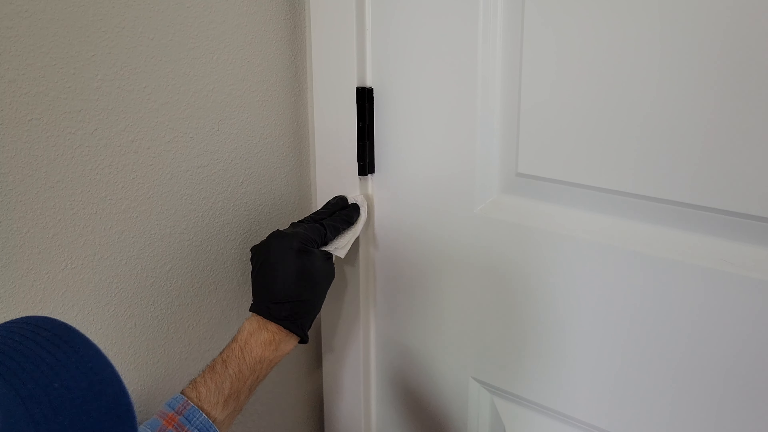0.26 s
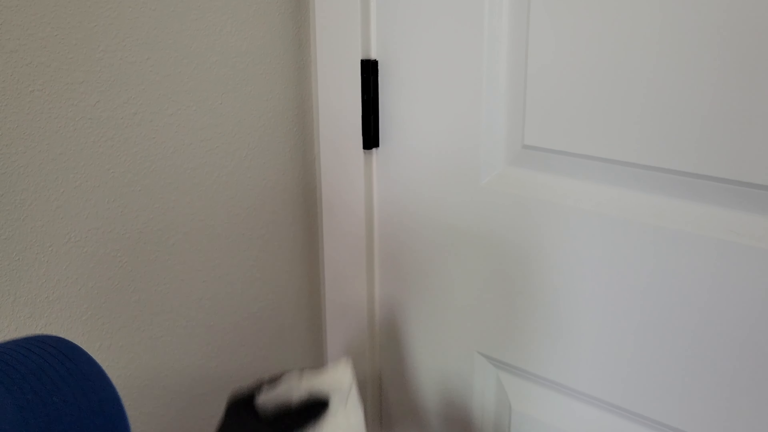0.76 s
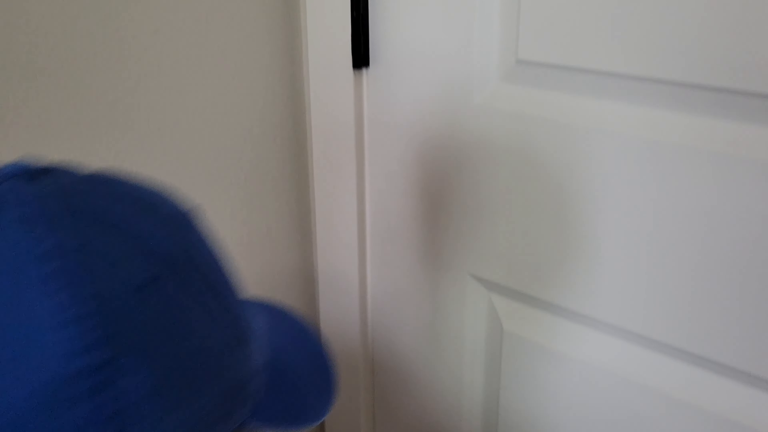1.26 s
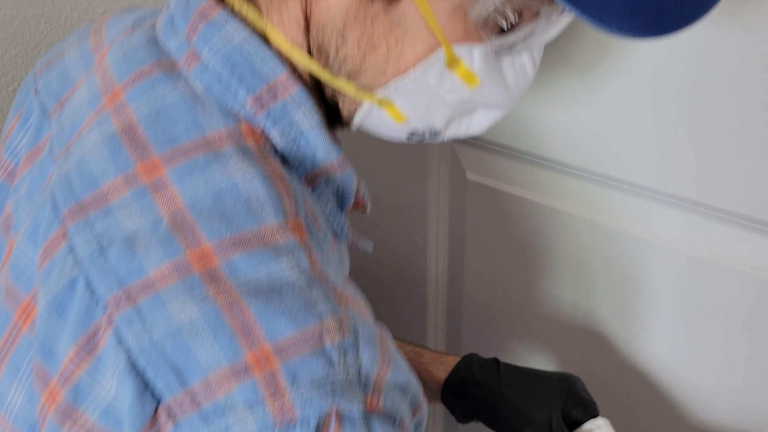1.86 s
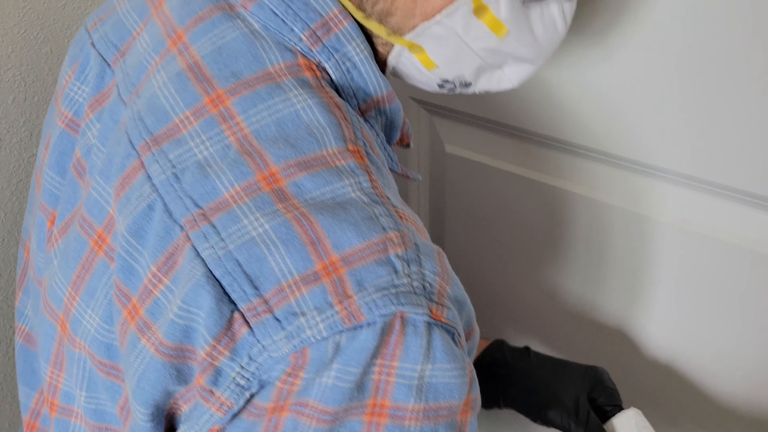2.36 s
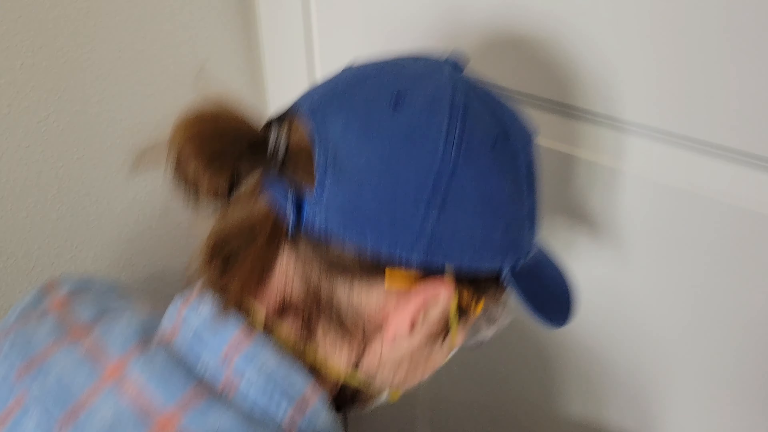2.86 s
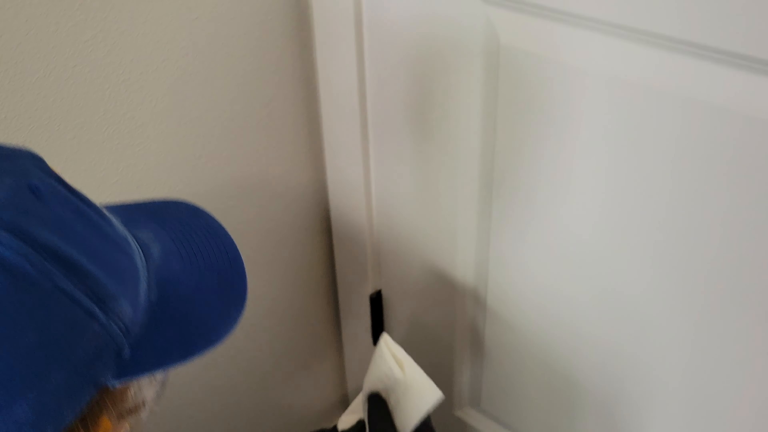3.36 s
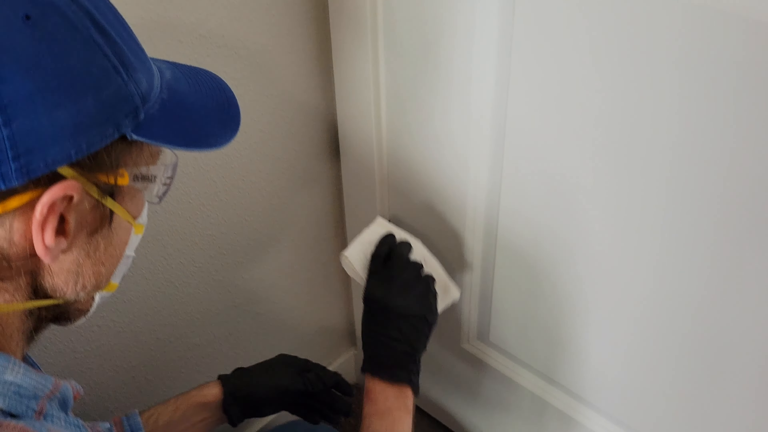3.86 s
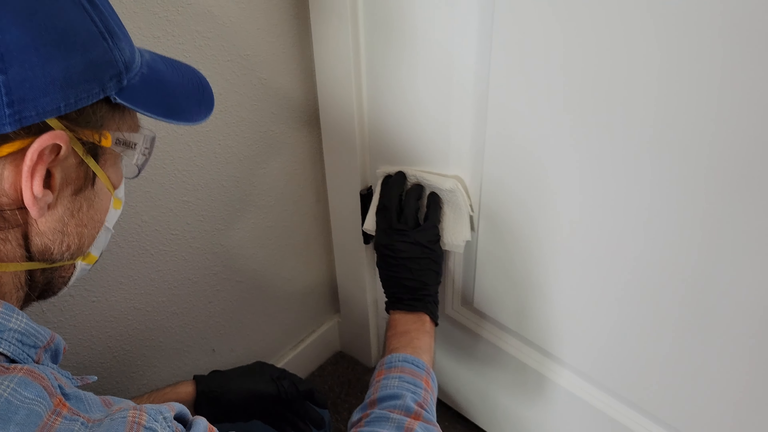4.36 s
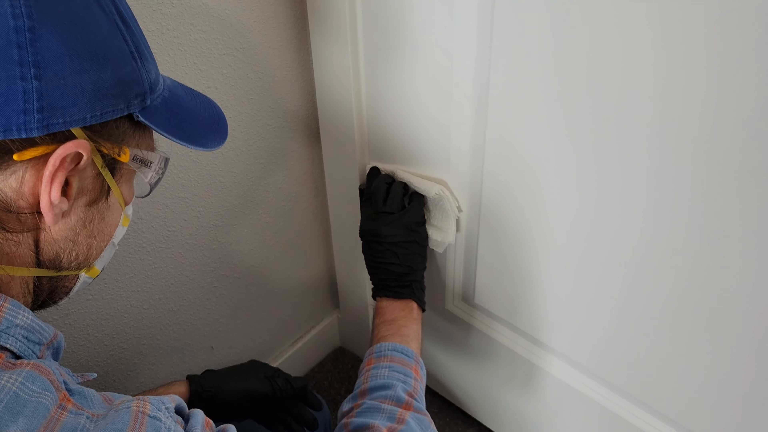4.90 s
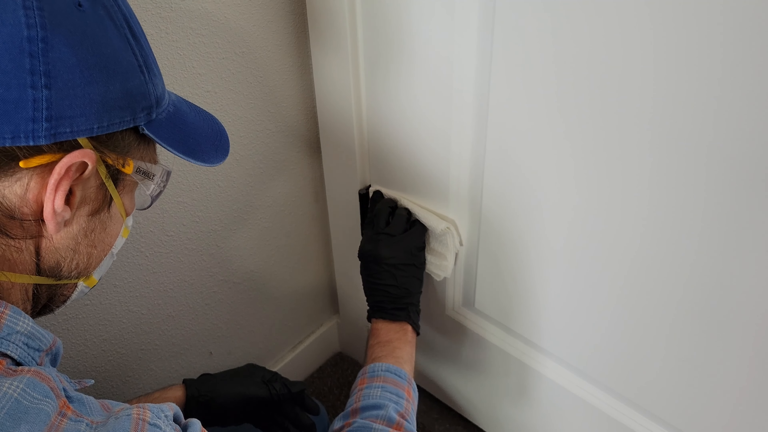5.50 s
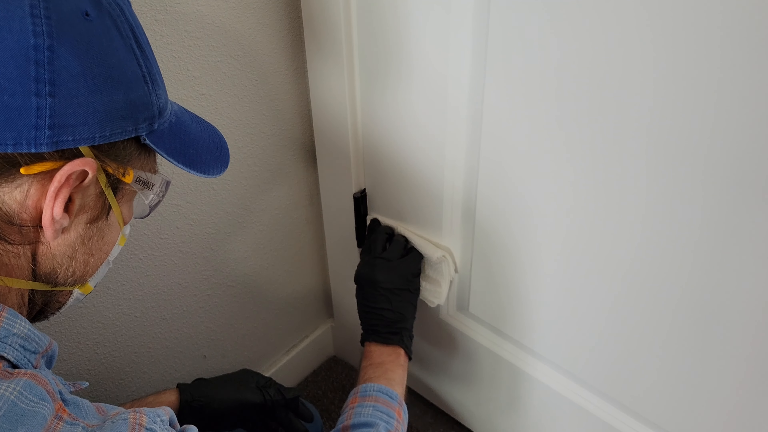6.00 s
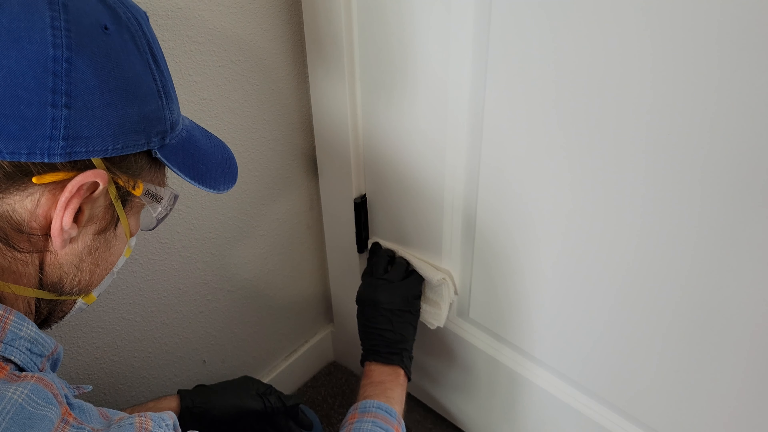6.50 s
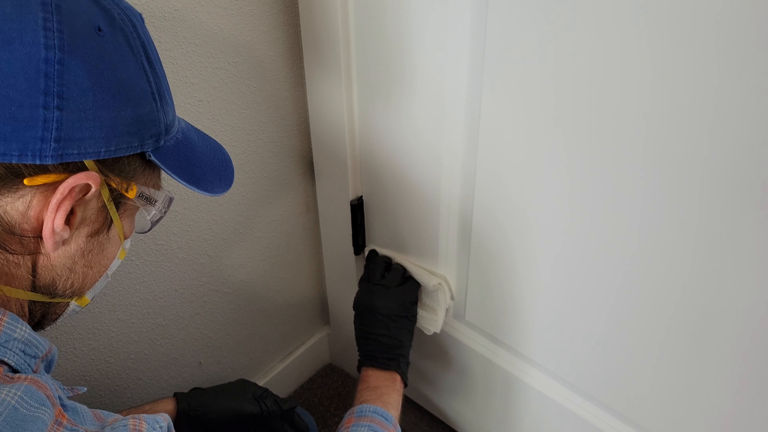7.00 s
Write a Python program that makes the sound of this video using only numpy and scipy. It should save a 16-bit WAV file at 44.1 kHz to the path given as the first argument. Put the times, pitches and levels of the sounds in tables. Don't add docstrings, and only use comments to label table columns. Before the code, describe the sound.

Over a steady, low ventilation rumble, a paper towel brushes lightly along a door frame. It is then folded and shifted with irregular rustles, small crackles and sleeve movement, while a knee thuds softly on the floor and a can drags briefly with a hollow scrape. Longer dry wipes over a hinge follow, ending in quick fingertip taps. Close stereo microphone in a small, dry hallway.

```python
import sys
import numpy as np
from scipy import signal
from scipy.fft import rfft, irfft, next_fast_len
from scipy.io import wavfile
from scipy.ndimage import uniform_filter1d

SR = 44100
rng = np.random.default_rng(int(sys.argv[2]) if len(sys.argv) > 2 else 0)


def waveform_to_disk(signal):
    frames = np.transpose(np.atleast_2d(signal))
    scaled = np.clip(frames, -1, 1) * 32767
    samples = np.round(scaled).astype(np.int16)
    wavfile.write(sys.argv[1], SR, samples)


def makeup_ratio(level_db):
    decades = np.asarray(level_db, float) / 20
    return 10 ** decades


N = 319725


def rms_one(x):
    return x / np.sqrt(np.mean(x ** 2) + 1e-20)


def in_time(rows, outside=None):
    s, *columns = np.transpose(rows)
    return [np.interp(np.arange(N) / SR, s, column, outside, outside) for column in columns]


def at_hz(points, hz):
    points_hz, values = np.array(points).T
    return np.interp(np.log(hz), np.log(points_hz), values)


def drift(rate_hz):
    thinning, warm_up = 40, 2000
    r = np.exp(-2 * thinning * np.pi * rate_hz / SR)
    noise = rng.standard_normal(N // thinning + warm_up + 2)
    slow = signal.lfilter([1], [1, -2 * r, r * r], noise)[warm_up:]
    return np.interp(np.arange(N) / thinning, np.arange(len(slow)), rms_one(slow))


def low_pass(x, hz, order=2):
    return signal.sosfilt(signal.butter(order, hz, fs=SR, output="sos"), x)


def high_pass(x, hz):
    return signal.sosfilt(signal.butter(2, hz, "high", fs=SR, output="sos"), x)


def resonate(x, hz, width_hz):
    r = np.exp(-np.pi * width_hz / SR)
    zeros = np.array([1, 0, -1]) * (1 - r * r) / 2
    return signal.lfilter(zeros, [1, -2 * r * np.cos(2 * np.pi * hz / SR), r * r], x)


def body(x, resonances):
    modes = [makeup_ratio(db) * resonate(x, hz, width_hz) for hz, width_hz, db in resonances]
    return rms_one(sum(mode * (-1) ** k for k, mode in enumerate(modes)))


def burst(seconds, t60_s):
    t = np.arange(round(seconds * SR)) / SR
    return rng.standard_normal(len(t)) * makeup_ratio(-60 * t / t60_s)


def bands(white, spectrum, count):
    # (frequency [Hz], left-right likeness [0..1])
    likeness = [(40, 0.92), (150, 1), (300, 0.79), (600, 0.68), (1200, 0.22), (2500, 0.83), (6000, 0.025),
                (12000, 0.02)]
    # (frequency [Hz], left over right [dB])
    lean = [(60, -0.5), (110, 0.5), (200, -4.5), (380, 4), (700, -1.5), (1290, 1), (2370, -4.5), (4380, -2),
            (8090, 1), (14900, 0)]
    edges = np.geomspace(spectrum[0][0], min(spectrum[-1][0], .45 * SR), count + 1)
    for k, (low, high) in enumerate(zip(edges, edges[1:])):
        band_filter = signal.butter(2, [low, high], "band", fs=SR, output="sos")
        mid, side = signal.sosfilt(band_filter, white[k % 2])
        hz = np.sqrt(low * high)
        alike = np.clip(at_hz(likeness, hz), 0, 1)
        lean_db = at_hz(lean, hz) / 2
        pair = np.sqrt(1 + alike) * mid + np.sqrt(1 - alike) * side * [[1], [-1]]
        yield hz, makeup_ratio(at_hz(spectrum, hz)) * pair * makeup_ratio(np.array([[lean_db], [-lean_db]]))


def steady(spectrum, level_db, patchy_db, count):
    parts = bands(rng.standard_normal((2, 2, N)), spectrum, count)
    return makeup_ratio(level_db) * rms_one(sum(band * makeup_ratio(patchy_db * drift(5.4)) for hz, band in parts))


def blower():
    # (multiple of the blower pitch [1], level [dB])
    overtone_table = [(2, -9), (3, -9), (4, -17.5), (5, -21), (6, -30)]
    # (time [s], level [dB])
    room_mode_level = [(0, -74), (.45, -65), (.65, -45), (1.55, -51), (1.75, -64), (2.1, -48), (2.35, -49),
                       (3.1, -52), (3.6, -80), (4.2, -60), (5, -50), (7.25, -57)]
    t = np.arange(N) / SR
    speeds_up_s, slow_hz, fast_hz, wobble_hz = 6.2, 56.18, 57.63, 0.21
    hz = np.where(t < speeds_up_s, slow_hz, fast_hz) + wobble_hz * drift(3.0)
    tone_db = -46 + 3 * drift(2.2)
    turn = 2 * np.pi * np.cumsum(hz) / SR
    overtones = sum(makeup_ratio(db + 2.1 * drift(4.1)) * np.cos(k * turn + 0.5 * drift(3.6))
                    for k, db in overtone_table)
    pulse = makeup_ratio(tone_db) * np.cos(turn) + makeup_ratio(np.mean(tone_db)) * overtones
    room_mode_db, = in_time(room_mode_level)
    room_mode_hz, hum_hz = 51, 119.84
    room_mode = makeup_ratio(room_mode_db) * np.sin(2 * np.pi * room_mode_hz * t + 1.5 * drift(1.0))
    hum = makeup_ratio(-53.5 + 2.2 * drift(0.59)) * np.sin(2 * np.pi * hum_hz * t)
    return np.sqrt(2) * (room_mode + hum - pulse)


def ventilation():
    # (frequency [Hz], density [dB per Hz])
    rumble = [(15, -62), (25, -18), (29, -49), (36, -27), (59, -3.5), (81, -8), (103, -5), (155, -11),
              (184, -14.5), (226, -6), (317, -33.5), (353, -28), (450, -53), (580, -78), (990, -120)]
    # (frequency [Hz], density [dB per Hz])
    room_air = [(240, -49), (400, -5), (445, -11.5), (503, -12), (652, -22), (760, -6.5), (832, -4),
                (926, -14), (1020, -18), (1510, -23.5), (3000, -38), (6500, -40), (7400, -50), (15400, -39)]
    # (frequency [Hz], width [Hz], level [dB])
    duct_modes = [(95, 36, -2.5), (116, 13, 9.5), (152.4, 4, -1), (183.8, 14.7, -2.5), (227, 26, -11),
                  (309, 130, -17.5), (357, 15, -2.5)]
    # (time [s], level [dB])
    flow = [(0.0, -41), (0.3, -46.5), (0.64, -41), (0.83, -43.5), (2.79, -41.5), (3.03, -42), (3.71, -44.5),
            (4.26, -42.5), (4.78, -47), (6.46, -43.5), (6.78, -45), (7.25, -43)]
    flow_db, = in_time(flow)
    deep_db = 0.89 * flow_db
    upper_db = 0.97 * flow_db + 2 * drift(3.7)
    duct = steady(rumble, -46, patchy_db=2.0, count=11)
    duct = duct + makeup_ratio(-48.5) * body(duct, duct_modes)
    deep = makeup_ratio(deep_db - np.mean(deep_db)) * low_pass(duct, 200)
    upper = makeup_ratio(upper_db - np.mean(upper_db)) * high_pass(duct, 200)
    return blower() + deep - upper + steady(room_air, -66.5, patchy_db=1.5, count=16)


def knocks():
    # (time [s], peak [dB], pitch [Hz], decay
    # time T60 [s])
    knock_table = [(1.2, -36, 237, 0.086), (1.7551, -21.5, 150, 0.11), (1.759, -24.5, 220, 0.045),
                   (1.757, -32.5, 354, 0.08), (2, -40, 580, 0.03), (3.014, -29.5, 283, 0.17),
                   (3.034, -32, 280, 0.15), (3.075, -38.5, 270, 0.23), (4.959, -57, 226, 0.068),
                   (6.9886, -26.5, 103, 0.15), (0.063, -28, 95.5, 0.14), (0.709, -28.5, 96, 0.15)]
    out, t = np.zeros(N + SR), np.arange(SR // 4) / SR
    padding = (1 - np.exp(-t / 0.0023)) ** 2
    for s, peak_db, hz, t60_s in knock_table:
        phase = 2 * np.pi * hz * t * (1 + .15 * np.exp(-t / .015))
        board = np.sin(phase) * makeup_ratio(-60 * t / t60_s)
        puff = rms_one(resonate(burst(.25, .5 * t60_s), 2.5 * hz, 1.0 * hz))
        at = round(s * SR)
        out[at:at + len(t)] += makeup_ratio(peak_db) * (board + 0.018 * puff) * padding
    return out[:N]


def dragged_can():
    # (time [s], level [dB])
    drag = [(2.9, -61), (2.94, -56), (2.984, -51), (3.012, -44), (3.032, -41), (3.066, -50), (3.11, -53),
            (3.14, -62), (3.2, -88)]
    # (frequency [Hz], width [Hz], level [dB])
    can_modes = [(284, 27.5, 6.5), (789, 50, -10), (1240, 35, -9.5), (1888, 26, -18), (2240, 53, -11),
                 (2950, 24, -11), (3530, 81, -19), (4150, 67, -16), (4600, 54, -8.5), (4900, 30, -30),
                 (4900, 40, -13), (5230, 100, -10)]
    level_db, = in_time(drag, outside=-120)
    slips = rng.standard_normal(N)
    modes = 0
    for hz, width_hz, db in can_modes:
        mode = resonate(resonate(slips, hz, 1.3 * width_hz), hz, 2.0 * width_hz)
        modes = modes + makeup_ratio(db) * rms_one(mode)
    return makeup_ratio(level_db) * modes


def hinge_taps():
    # (time [s], peak [dB])
    tap_table = [
        (6.9578, -28),
        (6.9645, -35),
        (6.970, -32),
        (6.9775, -38),
    ]
    # (frequency [Hz], level [dB], free decay time T60 [s])
    hinge_modes = [(1087, 5, 0.42), (1515, 8, 0.11), (1850, -6, 0.44), (2260, -15, 0.098),
                   (2340, -15, 0.17), (3180, -17, 0.23), (4420, 0, 0.16), (5512, -15, 0.1),
                   (7400, -6, 0.012), (8829, -38, 5.0)]
    padded_t60_s = .022
    out, t = np.zeros(N + SR), np.arange(SR // 4) / SR
    for s, peak_db in tap_table:
        modes = 0
        for hz, db, t60_s in hinge_modes:
            fade_db = db + rng.normal(0, 1.3) - 60 * t / min(t60_s, padded_t60_s)
            modes = modes + makeup_ratio(fade_db) * np.sin(2 * np.pi * hz * t)
        skid = burst(len(t) / SR, .035)
        scrape = 8 * resonate(resonate(skid, 1300, 1300), 1300, 1800)
        scrape = scrape + resonate(resonate(skid, 4800, 4500), 4800, 4500)
        scrape = scrape + 3 * resonate(skid * makeup_ratio(-60 * t / .02), 7400, 1800)
        at = round(s * SR)
        out[at:at + len(t)] += makeup_ratio(peak_db - 11) * (.7 * modes + scrape)
    return low_pass(out[:N], 8400, order=6)


def snaps():
    # (time [s], peak [dB], colour [Hz], broad crack share [dB], left over right [dB])
    snap_table = [(1.028, -37.5, 2860, -25, 1), (1.1175, -43, 1888, -10, 8), (1.195, -41, 1320, 1, 7),
                  (1.6645, -44.5, 1237, 3.5, -4), (1.902, -49, 1240, 7, -1.0),
                  (1.9882, -35.5, 3090, -12, 6), (2.077, -45, 1930, 9.5, -1.5), (2.375, -53, 1230, 7, 0.0),
                  (2.8185, -34.5, 3260, -21, -5), (3.188, -50.5, 1970, 11.5, 18),
                  (3.7557, -38.5, 2170, -17, -2), (3.814, -36.5, 930, -5, 0.5),
                  (4.466, -40.5, 2720, -15, -1), (4.622, -43, 2300, 0, -1.5)]
    # (time [s], peak [dB], colour [Hz], broad crack share [dB],
    # left over right [dB])
    tick_table = [(1.7384, -38.5, 2400, -1, 0), (1.739, -36, 1450, -10, 0), (1.7395, -39, 650, -12, 0),
                  (1.7386, -43, 3750, -12, 0), (1.8005, -41, 1560, -16, 0), (1.8322, -35, 1530, -8, -1),
                  (4.0113, -45, 1340, -16, -1), (4.2712, -41, 1700, -3, -1), (4.283, -38, 2300, -3, -1),
                  (4.623, -42, 1500, -3, -1), (4.960, -39, 600, -8, 0)]
    out = np.zeros((2, N + SR))
    t = np.arange(round(.15 * SR)) / SR
    soft = 1 - np.exp(-t / .003)
    hard = (1 - np.exp(-t / .0006)) * makeup_ratio(-60 * t / .065)
    onsets = [soft] * len(snap_table) + [hard] * len(tick_table)
    for (s, peak_db, hz, crack_db, pan_db), onset in zip(snap_table + tick_table, onsets):
        crack = 3 * resonate(resonate(burst(.15, .035), 1500, 5000), 1500, 5000)
        crack = low_pass(crack, 5800)
        ring = resonate(burst(.15, .075), hz, 0.16 * hz)
        sound = (ring / np.abs(ring).max() + makeup_ratio(crack_db) * crack) * onset
        sides_db = np.array([[pan_db], [-pan_db]]) / 2
        at = round(s * SR)
        out[:, at:at + len(t)] += makeup_ratio(peak_db - 2 + sides_db) * sound
    return out[:, :N]


def scuffs():
    # (start [s], length [s], from [Hz], to [Hz], level [dB])
    scuff_table = [(1.016, .045, 2830, 2950, -59), (1.179, 0.033, 1850, 1900, -59),
                   (1.21, .03, 2580, 3100, -60), (2.951, 0.12, 1250, 1240, -50.5),
                   (2.98, 0.066, 6300, 6150, -56), (2.99, .07, 4630, 4500, -58),
                   (3.0, 0.055, 4150, 4100, -59), (2.99, 0.092, 800, 780, -55),
                   (3.75, .035, 2160, 2130, -58), (3.765, .035, 2730, 3080, -55),
                   (3.998, 0.03, 1406, 1316, -52.5), (4.273, 0.04, 1666, 1700, -54),
                   (4.969, .43, 2500, 2650, -61), (5.294, 0.61, 2573, 2840, -59.5),
                   (5.284, 0.31, 1370, 1480, -65), (5.739, .72, 1620, 1693, -63),
                   (6.197, 0.36, 1072, 1066, -65), (1.105, .035, 4300, 4300, -62),
                   (1.22, .025, 6200, 6200, -65), (1.263, .035, 4470, 4600, -61),
                   (1.31, 0.022, 2900, 3130, -65), (1.655, 0.034, 3300, 3400, -63),
                   (1.761, 0.083, 1444, 1550, -59), (1.912, .04, 3000, 2720, -60),
                   (2.017, 0.037, 4800, 4800, -55), (2.017, .05, 1910, 1950, -57),
                   (2.125, .04, 2800, 2800, -58), (2.962, .05, 5300, 5500, -61),
                   (3.0, .09, 2340, 2200, -55), (2.997, 0.082, 3100, 2930, -53),
                   (3.04, .04, 5130, 5050, -62), (3.067, .05, 4800, 4650, -62),
                   (3.15, 0.066, 2890, 2950, -58), (4.262, .035, 2510, 3400, -58),
                   (1.737, 0.024, 750, 600, -54), (1.738, 0.018, 1250, 1200, -57),
                   (6.957, 0.027, 650, 597, -53), (6.964, .008, 4800, 4900, -49),
                   (6.957, .006, 7300, 7200, -49)]
    out = np.zeros((2, N + SR))
    for s, seconds, from_hz, to_hz, level_db in scuff_table:
        slow = seconds > .2
        width_hz = (.11 if slow else .055) * from_hz
        white = rng.standard_normal((2, 2, 4 * SR // 5 if slow else SR // 5))
        shake = low_pass(white, width_hz / 2)[..., 2000:]
        way = np.linspace(0, 1, round(seconds * SR))
        turn = 2 * np.pi * np.cumsum(from_hz + (to_hz - from_hz) * way) / SR
        shake = shake[..., :len(way)] / np.std(shake)
        both, apart = shake[:, 0] * np.cos(turn) + shake[:, 1] * np.sin(turn)
        both = .8 * both + .8 * (seconds < .2) * np.sin(turn)
        at = round(s * SR)
        whistle = both + 0.68 * apart * [[1], [-1]]
        out[:, at:at + len(way)] += makeup_ratio(level_db) * np.sin(np.pi * way) * whistle
    return out[:, :N]


def strokes():
    # (firmest [s], rise [s], fall [s], level [dB], brightness [dB])
    frame_strokes = [
        (0.0, 0.02, 0.0075, -54, 2.5),
        (0.087, 0.22, 0.433, -67, 7),
        (0.631, 0.18, 0.019, -63.5, 7.5),
    ]
    # (firmest [s], rise [s], fall [s], level [dB], brightness [dB])
    folds = [(0.784, 0.12, 0.141, -79.5, 19), (1.049, 0.081, 0.055, -57, -5),
             (1.109, 0.013, 0.057, -55.5, -3.5), (1.241, 0.1, 0.21, -56.5, -0.5),
             (1.455, 0.051, 0.11, -61, -5.5), (1.522, 0.043, 0.17, -57.5, 4.5),
             (1.78, 0.22, 0.15, -61, -3.5), (1.94, 0.045, 0.054, -55.5, 3.5), (2.042, 0.078, 0.08, -51, 6),
             (2.128, 0.021, 0.075, -51.5, 1.5), (2.221, 0.076, 0.17, -63, -4),
             (2.395, 0.042, 0.26, -58.5, 0), (2.746, 0.13, 0.09, -63, -5), (2.828, 0.036, 0.087, -55, 0.7),
             (3.034, 0.18, 0.21, -48.5, -4), (3.165, 0.02, 0.18, -58.5, -1),
             (3.413, 0.083, 0.045, -55.5, 2.8), (3.467, 0.014, 0.041, -52.5, 3),
             (3.556, 0.084, 0.093, -54, -4), (3.773, 0.082, 0.19, -56.5, 0.5),
             (4.059, 0.15, 0.084, -62, -7.5)]
    # (firmest [s], rise [s], fall [s], level [dB], brightness [dB])
    wipes = [(4.28, 0.2, 0.11, -54, -3.5), (4.365, 0.12, 0.039, -57, 10), (4.487, 0.049, 0.082, -62, 23),
             (4.661, 0.074, 0.012, -56.5, 11), (4.715, 0.062, 0.086, -55.5, 12.5),
             (4.875, 0.083, 0.12, -54.5, 6), (5.061, 0.08, 0.072, -58, -6),
             (5.214, 0.092, 0.58, -57.5, -4.5), (5.539, 0.36, 0.94, -54, -2.5),
             (6.239, 0.31, 0.28, -53.5, 1.3), (6.975, 0.023, 0.04, -55, 0), (7.025, 0.047, 0.1, -54, -1.5),
             (7.29, 0.18, 0.027, -53.5, -2)]
    # (firmest [s], rise [s], fall [s], level [dB], brightness [dB])
    presses = [
        (3.95, 0.25, 0.34, -73, 1),
        (4.6, 0.45, 0.58, -61, -3),
        (5.08, 0.074, .15, -73, 8),
        (5.88, 0.23, 0.031, -57.5, 0),
        (6.43, 0.14, 0.057, -57, -5.5),
        (6.956, .035, .01, -76, -5),
    ]
    # (ring of the wood [dB], dull cloth [dB])
    motions = [
        (-8.5, 0.5),
        (-10, -1),
        (-8, -7),
        (-5.5, -2),
        (-6.5, 5),
    ]
    hop = 32
    t = np.arange(0, N, hop) / SR
    moves = np.array(frame_strokes + folds + wipes + presses)
    firm, rise, fall, level_db, bright_db = moves.T[:, :, None]
    way = np.clip(1 - np.maximum((firm - t) / rise, (t - firm) / fall), 0, 1)
    touch = np.sin(way * np.pi / 2) ** (2 * 0.83)
    touch = uniform_filter1d(touch, max(round(0.014 * SR / hop), 1), axis=1)
    rest_from_s, rest_to_s = 6.49, 6.957
    resting = (t > rest_from_s) & (t < rest_to_s)
    rested = resting * (t - rest_from_s)
    linger_db = -78.5
    sleeve_db = np.maximum(-72 - 400 * rested, linger_db - 28 * rested)
    power = np.vstack([touch * makeup_ratio(2 * level_db), makeup_ratio(2 * sleeve_db)])
    counts = [len(frame_strokes), len(folds), len(wipes), len(presses), 1]
    kind = np.repeat(motions, counts, axis=0)
    traits = np.column_stack([np.append(bright_db, 0), kind])
    colour = traits.T @ power / power.sum(axis=0)
    colour[0] = np.where(resting & (sleeve_db < linger_db), -9, colour[0])
    return in_time(np.transpose([t, 10 * np.log10(power.sum(axis=0)), *colour]))


def rubbing():
    # (frequency [Hz], density [dB per Hz])
    paper = [(260, -60), (450, -0.5), (596, -3.5), (671, 0.5), (888, -5.5), (1060, 2), (1910, -5),
             (2690, -2.5), (3510, -6.5), (6240, -8), (8390, -16.5), (12900, -20.5), (15400, -4)]
    # (frequency [Hz], width [Hz], level [dB])
    door_modes = [(1056, 10, 5), (1320, 33, -0.5), (1683, 9.3, 4.5), (2013, 19, 5), (2330, 130, 5),
                  (2686, 51, 7), (4190, 145, 5), (4760, 34, 4)]
    # (frequency [Hz], width [Hz], level [dB])
    jamb_modes = [(1370, 60, -4), (2360, 120, -4), (2670, 60, 0), (3320, 110, 0), (3820, 40, -7),
                  (6650, 60, -8)]
    level_db, bright_db, press_db, dull_db = strokes()
    t = np.arange(N) / SR
    flutter = np.where((t > 5.2) & (t < 6.5), .4, 1)
    grains_per_s = 2500
    grain_size = makeup_ratio(3.5 * np.minimum(rng.exponential(1, N), 5))
    caught = (rng.random(N) < grains_per_s / SR) * grain_size
    grain = (1 + makeup_ratio(-6) * rms_one(caught)) * makeup_ratio(flutter * .9 * drift(21.6))
    friction = rng.standard_normal((2, 2, N)) * rms_one(grain)
    swing_db = np.maximum(level_db, -72) - np.median(level_db)
    shares = [dull_db + (0.58 - 1) * swing_db, 0, 0.53 * bright_db, bright_db]
    corners = np.log([750, 2000, 5000, 11000])
    even, shaded = 0, 0
    for hz, band in bands(friction, paper, count=14):
        weights = [np.interp(np.log(hz), corners, one) for one in np.eye(4)]
        colour_db = sum(w * share for w, share in zip(weights, shares) if w > 0)
        even = even + band
        shaded = shaded + band * makeup_ratio(colour_db + flutter * 1.5 * drift(16.3))
    push = friction[0, 0] + 1.1 * friction[0, 1] * [[1], [-1]]
    wood = np.where(t < .45, 2 * body(push, jamb_modes), body(push, door_modes))
    return makeup_ratio(level_db + 5.0) * (shaded / np.std(even) + makeup_ratio(press_db) * wood)


def hallway(x):
    t60_s, wall_cut_hz, thin_hz = 0.11, 4800, 500
    size = next_fast_len(N + SR)
    turn = 2 * np.pi * np.arange(size // 2 + 1) / size
    dull = 1 / (1 + 1j * turn * SR / (2 * np.pi * wall_cut_hz))
    thin = 1j * turn / (1j * turn + 2 * np.pi * thin_hz / SR)
    echo = np.zeros((2, len(turn)), complex)
    lags = (rng.uniform(.011, .045, 20) * SR).astype(int)
    for k, lag in enumerate(lags):
        loop = makeup_ratio(-60 * lag / SR / t60_s) * dull * np.exp(-1j * turn * lag)
        echo[k % 2] += loop / (1 - loop) * (-1) ** (k // 2)
    return irfft(rfft(x, size) * echo * thin, size)[:, :N]


def scene():
    air, rub = ventilation(), rubbing()
    hits = dragged_can() + hinge_taps() + knocks() + snaps()
    into_hall = makeup_ratio(-4) * hits.mean(axis=0) + makeup_ratio(-4.5) * rub.mean(axis=0)
    return hits + rub + hallway(into_hall) + air + scuffs()


def top_cut(x):
    return signal.sosfilt(signal.butter(12, 15530, fs=SR, output="sos"), x)


def record(dry):
    right_lag = 3
    mix = np.array([dry[0], np.roll(dry[1], right_lag)])
    mix = high_pass(mix, 30)
    mix = signal.sosfilt(signal.cheby2(14, 60, 15850, fs=SR, output="sos"), mix)
    return top_cut(mix)


dry = scene()
out = record(dry)
waveform_to_disk(out)
```